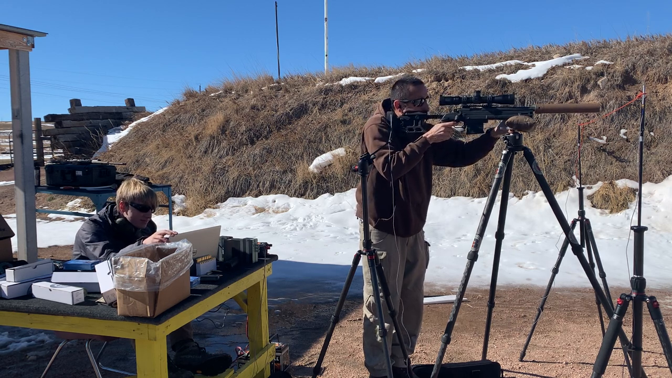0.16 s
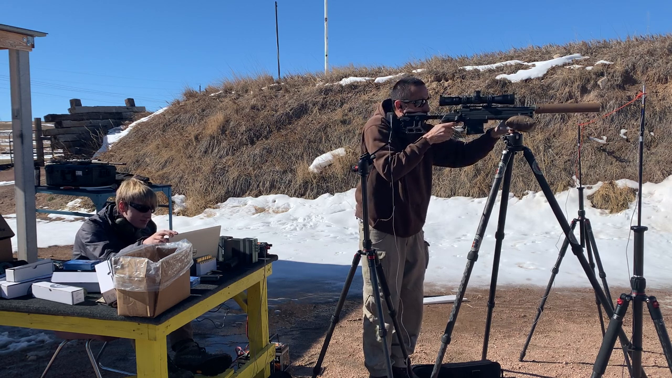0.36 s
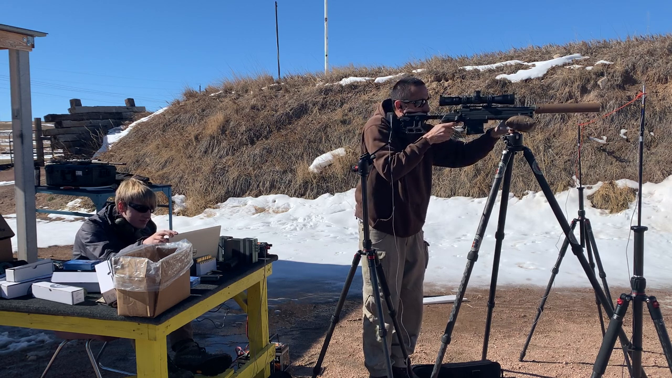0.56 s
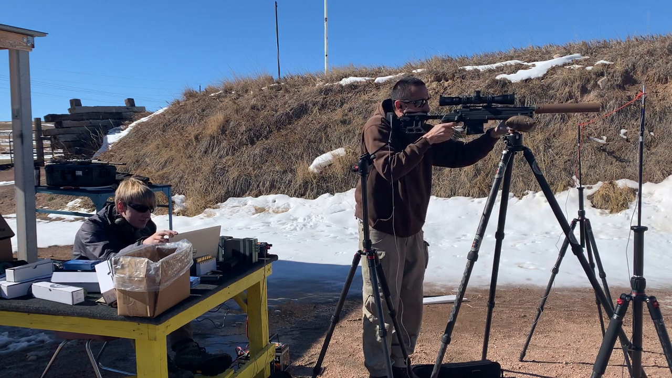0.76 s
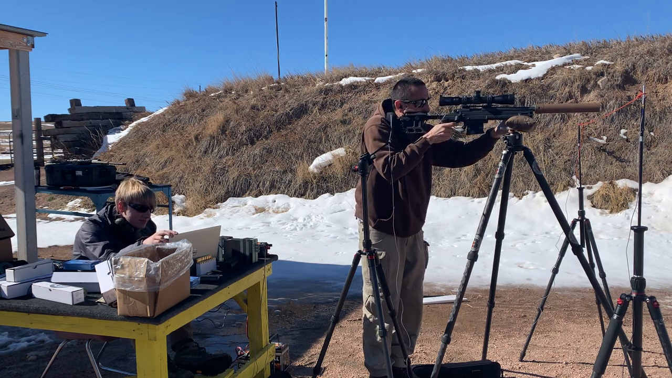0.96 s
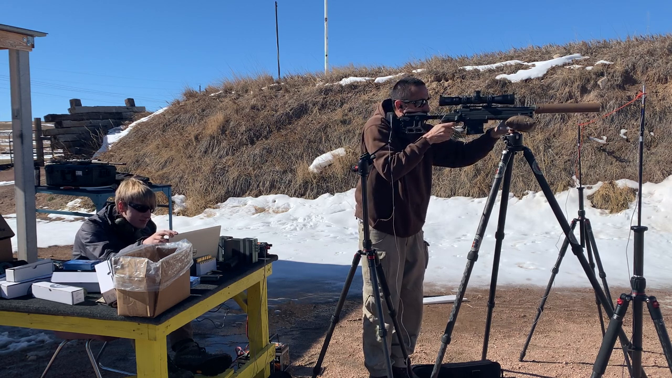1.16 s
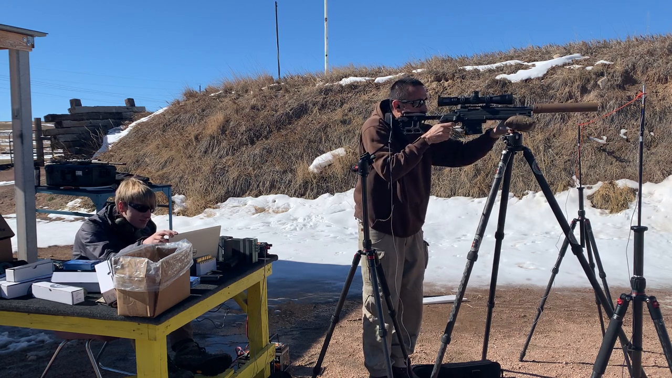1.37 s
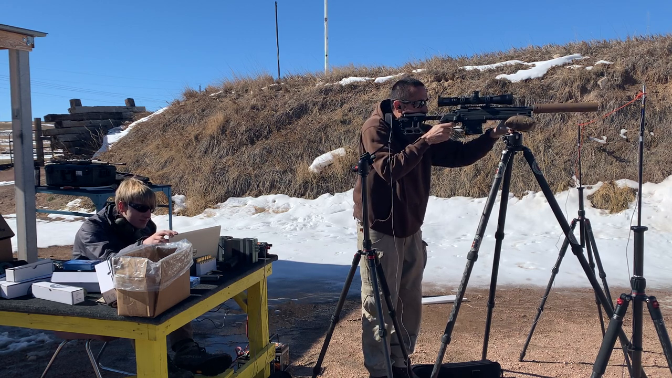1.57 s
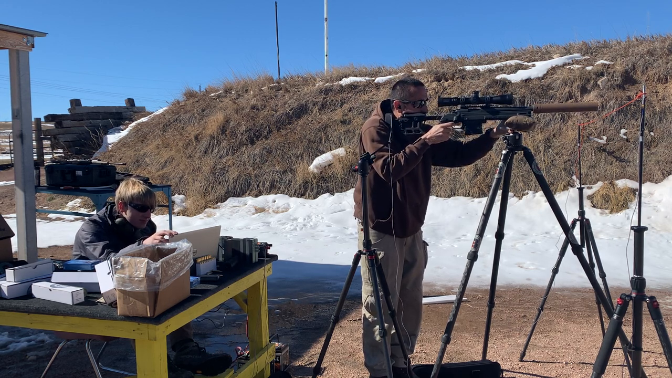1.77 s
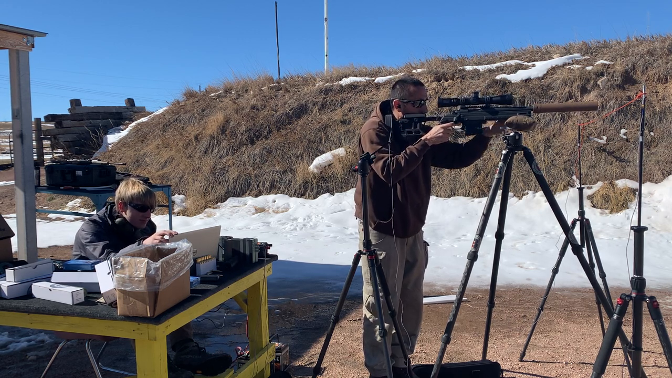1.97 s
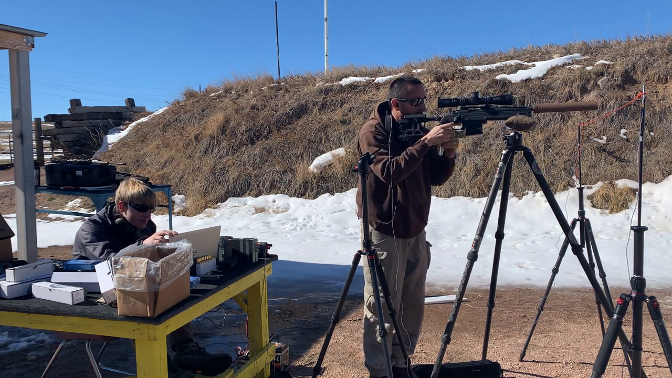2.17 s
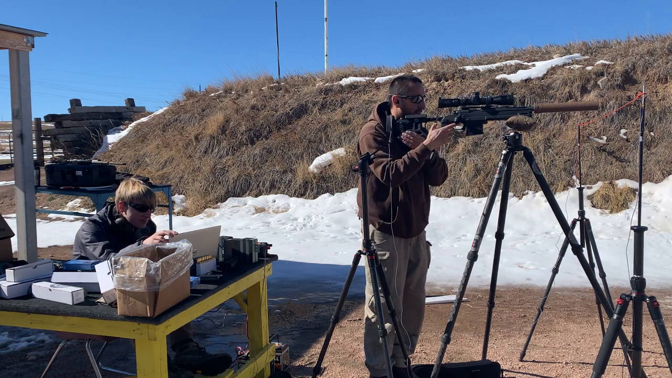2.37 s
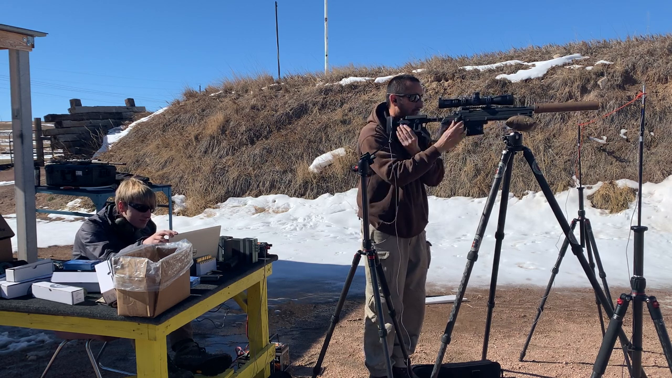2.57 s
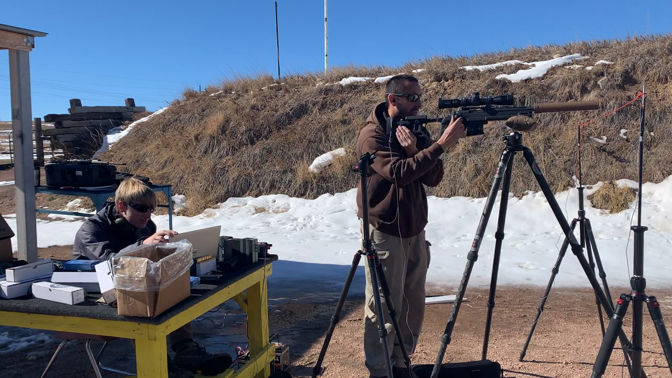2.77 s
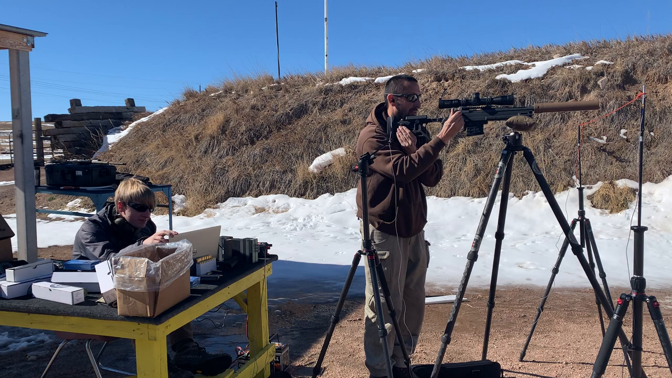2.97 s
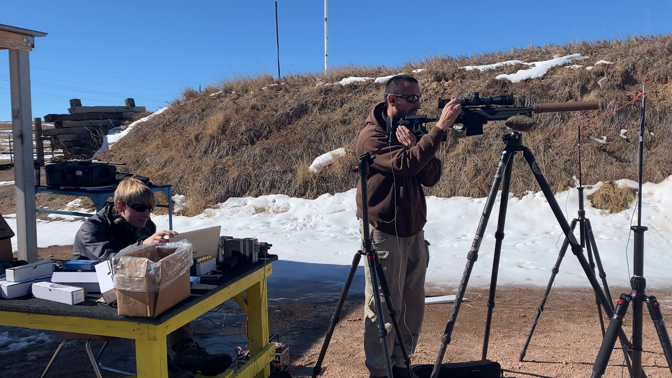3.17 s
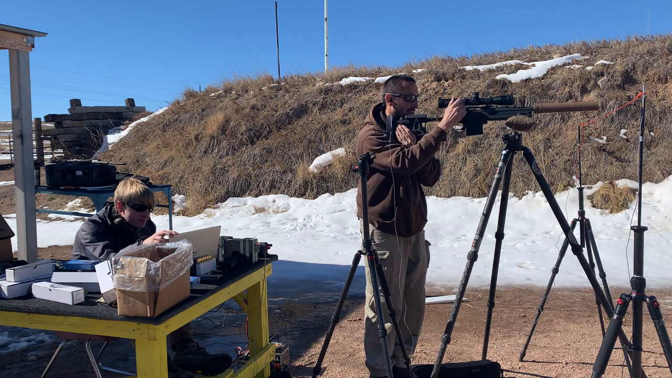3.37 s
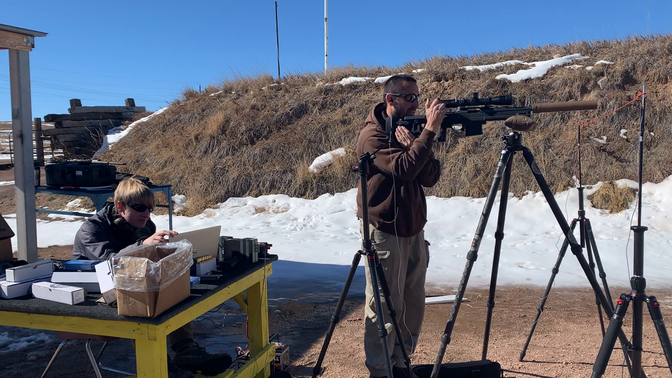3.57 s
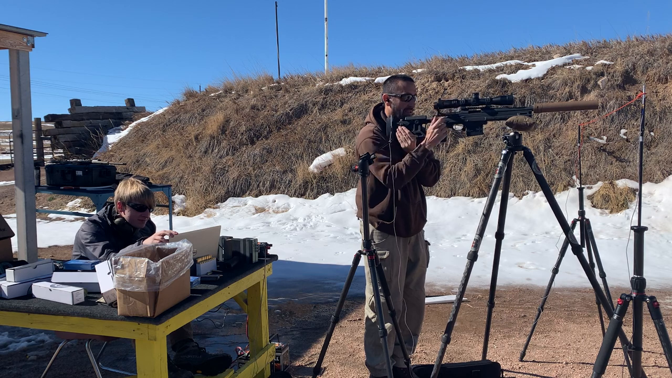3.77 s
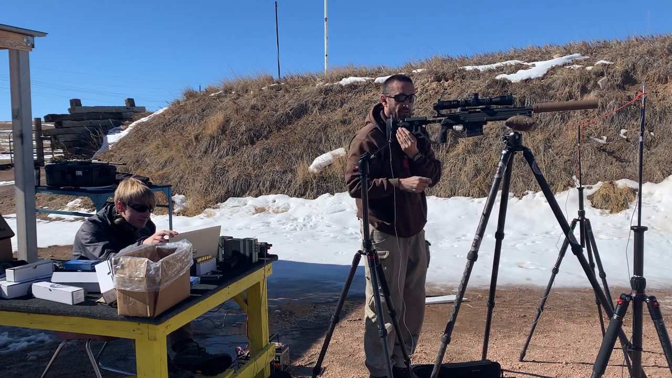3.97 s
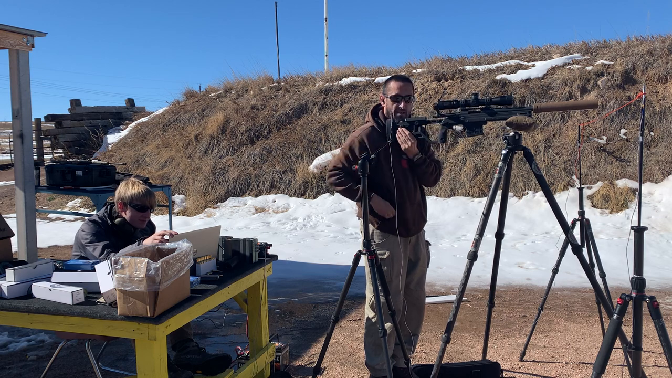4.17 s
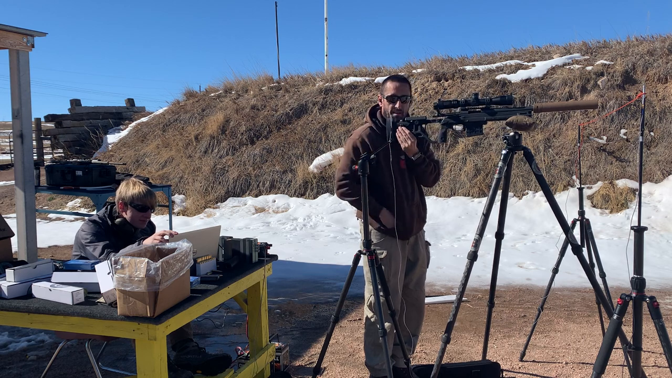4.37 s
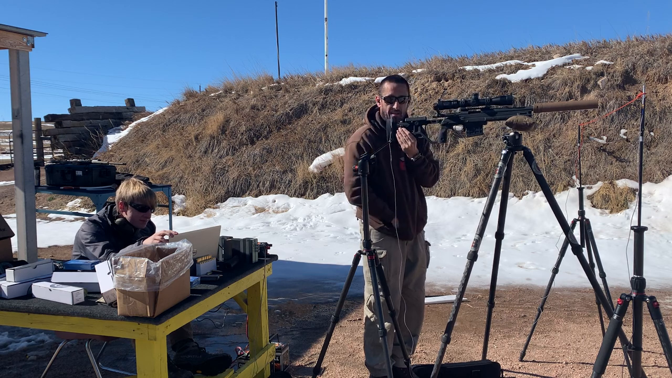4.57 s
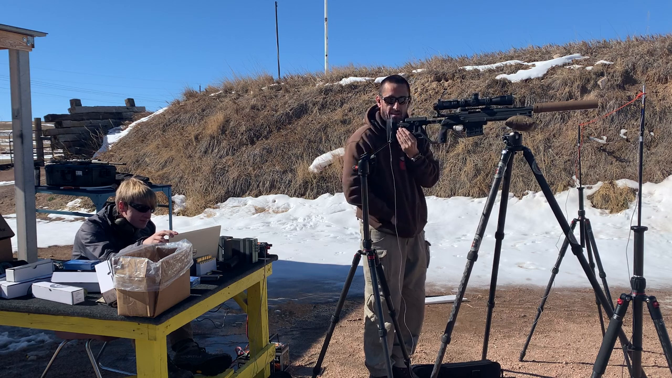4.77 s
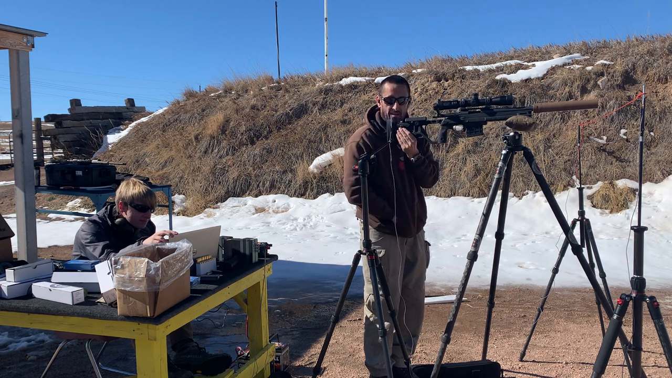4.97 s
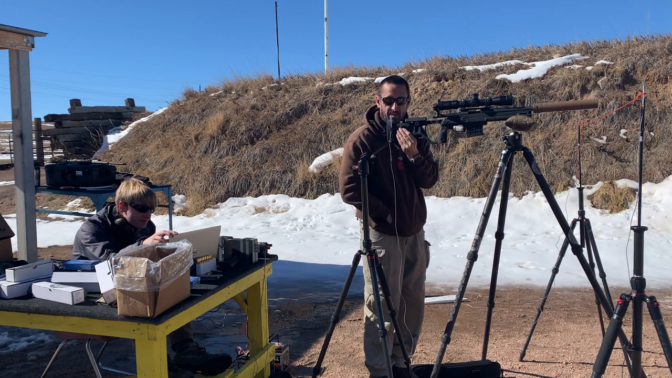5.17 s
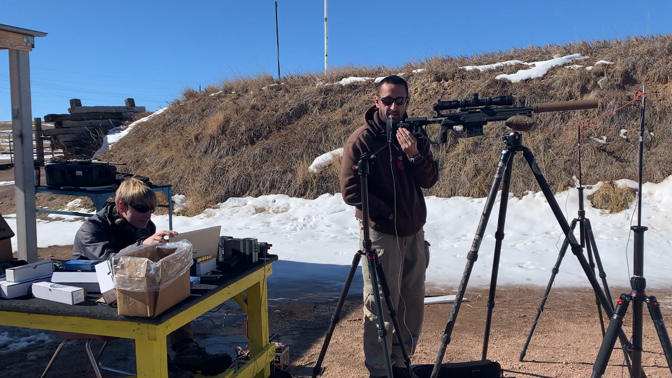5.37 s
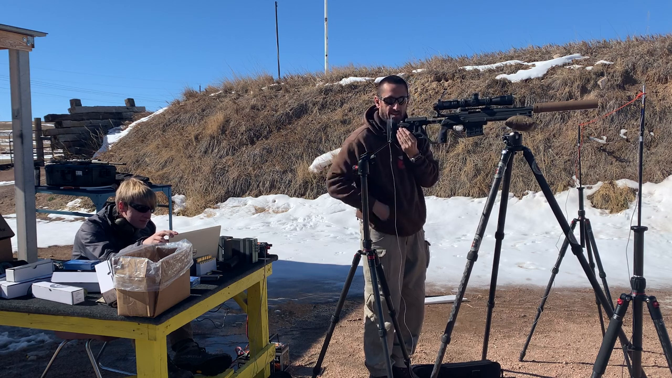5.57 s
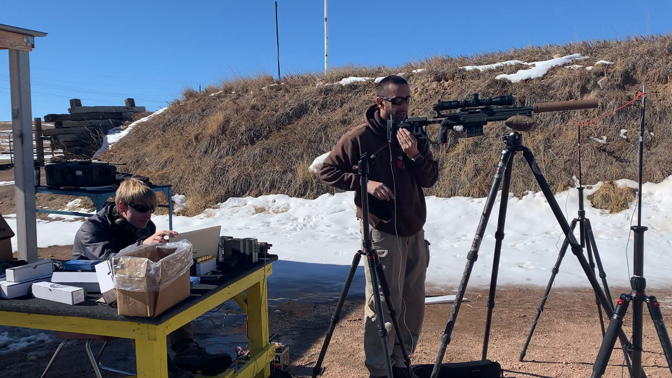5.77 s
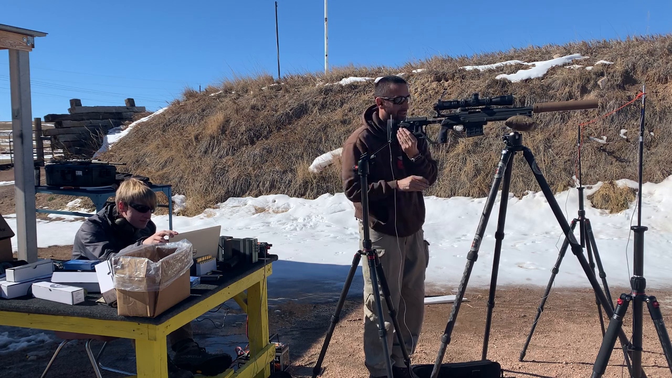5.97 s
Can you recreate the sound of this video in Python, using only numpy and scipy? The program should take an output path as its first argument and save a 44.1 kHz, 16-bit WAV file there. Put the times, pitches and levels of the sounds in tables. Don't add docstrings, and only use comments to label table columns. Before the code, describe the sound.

Quiet open-air range with low, lumpy wind buffeting the microphone and faint hiss. At 1.33 seconds a suppressed rifle fires once: an abrupt, loud burst of rushing gas with a brief metallic ring, slightly overloading the microphone. A sharp slap and hollow boom return from the earth banks at about 1.46, and the duller scatter dies away within roughly half a second. From 1.6 to 3.1 only tiny ticks, soft sleeve brushing and a thin lingering metal ring remain, while a very faint far engine whines up in steps from about 2.1 to 3.0 and settles into a steady drone. Between 3.24 and 3.75 the bolt is worked: quick steel clacks, strongest at 3.6, with bright brass clinks. Smaller metallic knocks come at 4.27 to 4.43, then sparse light ticks near 4.75, 4.9 and 5.0. Wind and distant drone continue to 6 seconds.

```python
import sys
import numpy as np
from scipy import signal
from scipy.fft import rfft, irfft, next_fast_len
from scipy.io import wavfile
from scipy.ndimage import uniform_filter1d

SR = 44100
rng = np.random.default_rng(int(sys.argv[2]) if len(sys.argv) > 2 else 0)


def transcribe(u):
    v = np.clip(np.atleast_2d(u).T, -1, 1)
    q = np.round(v * 32767).astype(np.int16)
    wavfile.write(sys.argv[1], SR, q)


def attenuation_scalar(level_db):
    decades = np.asarray(level_db, float) / 20
    return 10 ** decades


N = 265129


def evened(x):
    return x / np.sqrt(np.mean(x ** 2) + 1e-20)


def add(mix, start_s, sound):
    part = mix[round(start_s * SR):][:len(sound)]
    part += sound[:len(part)]


def level_over_time(rows):
    s, db = np.transpose(rows)
    return attenuation_scalar(np.interp(np.arange(N) / SR, s, db, left=-140, right=-140))


def coloured(points, size):
    fast = next_fast_len(size)
    hz = np.fft.rfftfreq(fast, 1 / SR)
    f, db = np.transpose(points)
    shape = attenuation_scalar(np.interp(np.log(hz + 1), np.log(f + 1), db))
    white = rng.standard_normal(size)
    return evened(irfft(rfft(white, fast) * shape, fast)[:size])


def band(x, lo_hz, hi_hz):
    limits = [lo_hz, min(hi_hz, SR / 2 - 1)]
    return signal.sosfilt(signal.butter(2, limits, "band", fs=SR, output="sos"), x)


def resonate(x, hz, width):
    r = np.exp(-np.pi * width / SR)
    return 2 * signal.lfilter([1 - r], [1, -r * np.exp(2j * np.pi * hz / SR)], x).real


def resonate_twice(x, hz, width, second_width):
    return resonate(resonate(x, hz, width), hz, second_width)


def flutter(per_s):
    knots = rng.standard_normal(600)
    return evened(np.interp(np.arange(N) * per_s / SR, np.arange(600), knots))


def air():
    # (f/Hz, level/dB per Hz)
    wind_colour = [(4.7, -30), (8.0, 3.5), (22, 6), (43, -5), (67, -6), (141, -29), (200, -31.5),
                   (260, -67), (440, -120)]
    # (t/s, level/dB)
    gusts = [(0, -51), (.3, -47.5), (.55, -53.5), (1.05, -50.5), (1.2, -60), (1.72, -51), (1.88, -59.5),
             (2.03, -52), (2.25, -60), (2.75, -60), (3.02, -52), (3.95, -62.5), (4.5, -54), (4.68, -59),
             (5.04, -50), (5.55, -58.5), (5.9, -49.5), (6.02, -52)]
    # (f/Hz, level/dB per Hz)
    still_colour = [(60, -31.5), (100, -10), (240, -21), (430, -26.5), (650, -28.5), (2040, -38),
                    (2930, -42), (6000, -48), (10000, -56), (13000, -57), (16500, -62.5)]
    lumps_db = 2.2 * flutter(9.9) + 0.91 * flutter(22)
    wind = level_over_time(gusts) * attenuation_scalar(lumps_db) * coloured(wind_colour, N)
    still_db = -74 + 0.4 * flutter(8)
    return wind + attenuation_scalar(still_db) * coloured(still_colour, N)


def engine():
    # (t/s, level/dB)
    strength = [(0, -91.5), (1.7, -88), (2.2, -83.5), (2.7, -75.5), (3.2, -73), (4.5, -72.5), (5.0, -74),
                (5.5, -74), (6.02, -73.5)]
    # (f/Hz, width/Hz, level/dB)
    drone_modes = [(398, 130, 0), (485, 86, -7.5), (670, 310, -7), (1000, 300, -12), (1360.4, 140, -9.5),
                   (1569, 12, -12.5), (1810, 200, -9), (2860, 260, -9.5), (3400, 95, -19.5),
                   (4400, 430, -19), (5100, 300, -24)]
    # (f/Hz, level/dB)
    hum = [(317.6, -88), (387.6, -79), (484.5, -79), (635.2, -85), (775.2, -82.5)]
    # (t/s, level/dB)
    load = [(4.7, -25), (5.0, -1.5), (5.5, -2.5), (6.02, 1)]
    # (start/s, end/s, from f/Hz, to f/Hz, level/dB)
    whine = [(2.079, 2.14, 2100, 2260, -89.5), (2.18, 2.236, 2150, 2260, -88),
             (2.276, 2.43, 1980, 2260, -91), (2.521, 2.807, 1930, 2180, -88), (2.798, 3.0, 2180, 2290, -87)]
    white = rng.standard_normal(N)
    drone = np.zeros(N)
    for hz, width, db in drone_modes:
        mode = evened(resonate_twice(white, hz, width, 2.85 * width))
        drone += attenuation_scalar(db + 1.1 * flutter(6.9)) * mode
    out = level_over_time(strength) * evened(drone)
    pulses = sum(attenuation_scalar(db) * evened(resonate(white, hz, 3.6)) for hz, db in hum)
    out += level_over_time(load) * pulses
    for start, end, from_hz, to_hz, db in whine:
        hz = np.linspace(from_hz, to_hz, round((end - start) * SR))
        tone = np.sin(2 * np.pi * np.cumsum(hz) / SR)
        add(out, start, attenuation_scalar(db + 1.5) * tone * signal.windows.tukey(len(hz), 0.5))
    return out


def blast():
    # (delay/s, level/dB, build-up/s per 60 dB, fade by 60 dB/s, thump against body/dB)
    returns = [
        (0, -16, 0.0012, .3, -12),
        (.013, -19, 0.0177, .085, -14),
        (.046, -42, 0.0572, .1, -12),
        (.068, -41, 0.0767, 0.22, -36),
        (.136, -46, .008, 0.078, -4.5),
        (.19, -58, 0.29, .09, -6),
        (.254, -70, .07, .11, -12),
    ]
    colour_db = [0, 0, 0, -1]
    air_loss = [0, 0, 24, 270]
    shot_s, jet_hold_s, jet_stop_t60 = 1.3307, 0.0099, 0.016
    field_db, field_t60 = -47.5, 0.53
    t = np.arange(N) / SR - shot_s
    field = attenuation_scalar(2 * field_db - 120 * t / field_t60) * (t > 0)
    power = np.outer([attenuation_scalar(-50), 1, 1, 1], field)
    for k, (delay, db, rise, t60, thump_db) in enumerate(returns):
        u = t - delay
        level_db = db + 60 * np.minimum(u / rise, -u / t60)
        if k == 0:
            level_db -= 60 * np.maximum(u - jet_hold_s, 0) / jet_stop_t60
        power += np.outer([attenuation_scalar(2 * thump_db), 1, 1, 1], attenuation_scalar(2 * np.maximum(level_db, -200)))
    return np.sqrt(power) * attenuation_scalar(np.c_[colour_db] - np.c_[air_loss] * np.maximum(t, 0))


def shot():
    # (f/Hz, level/dB per Hz)
    jet_colour = [(60, -26), (260, -12), (400, -26), (600, -16.5), (900, -10.5), (1800, -6), (3000, -10.5),
                  (4800, -10), (7500, -11.5), (10500, -15), (13000, -27), (14600, -28.5), (16500, -40)]
    # (f/Hz, width/Hz, level/dB)
    tube_modes = [(260, 40, -14.5), (800, 90, -16), (1060, 50, -15), (1790, 90, -4), (2111.5, 50, -10),
                  (4570, 90, -7), (4930, 40, -9), (5250, 90, -11), (6928, 150, -15)]
    white = rng.standard_normal(N)
    t = np.arange(N) / SR
    tube = sum(attenuation_scalar(db) * evened(resonate_twice(white, hz, w, 3 * w)) for hz, w, db in tube_modes)
    tube *= attenuation_scalar(-60 * np.maximum(t - 1.345, 0) / 0.12)
    fast = next_fast_len(N)
    jet = rfft(coloured(jet_colour, N) + tube, fast)
    octave = np.log(np.fft.rfftfreq(fast, 1 / SR) + 1)
    centres = np.log([250, 2100, 5000, 10000])
    parts = [irfft(jet * np.interp(octave, centres, hat), fast)[:N] for hat in np.eye(4)]
    grain = attenuation_scalar(1.8 * evened(uniform_filter1d(rng.standard_normal(N), 40)))
    loud = slice(round(1.33 * SR), round(1.4 * SR))
    return grain * sum(g * p / p[loud].std() for g, p in zip(blast(), parts))


def hit(peak_db, low_hz, high_hz, bright_db, t60, body=0.98):
    # (f/Hz, width/Hz, level/dB)
    action_modes = [(823, 110, -9.5), (1040, 29, -3.5), (1337, 58, -2), (1540, 53, -2), (1768, 31, 3),
                    (2530, 47, -13), (3300, 50, -45), (4840, 180, -9)]
    t = np.arange(5000) / SR
    noise, rough, luck = rng.standard_normal((3, len(t)))
    rattle = noise * attenuation_scalar(3.0 * rough - 60 * (t / t60) ** 1.4) * np.minimum(t / 0.0003, 1)
    rattle[12] += 7.0
    action = np.zeros(len(t))
    for (hz, width, db), r in zip(action_modes, luck):
        action += attenuation_scalar(db + 3 * r) * resonate(rattle, hz, width) / np.sqrt(width)
    low = evened(resonate_twice(rattle, low_hz, 400, 900))
    low += body * (evened(action) + 0.6 * evened(band(rattle, 700, 3600)))
    crack = 0.022 * band(rattle * attenuation_scalar(-60 * t / 0.006), 9000, 17000)
    high = band(resonate(rattle, high_hz, 1500) + 0.45 * rattle, 3000, 9500)
    high = band(high, 2500, 10000) + crack
    thud = band(band(rattle * attenuation_scalar(-60 * t / 0.012), 350, 900), 280, 1080)
    sound = evened(band(low, 594, 5700))
    sound += attenuation_scalar(bright_db) * evened(high)
    sound += 0.1 * body * evened(thud)
    return attenuation_scalar(peak_db) * sound / abs(sound).max()


def far_bank():
    # t/s, peak level/dB, low ring f/Hz, high ring f/Hz, brightness/dB, fade by 60 dB/s
    slap = (1.4641, -27.5, 5250, 5600, -5, .004)
    # (t/s, peak level/dB)
    booms = [
        (1.4637, -44),
        (1.479, -50),
    ]
    boom_hz, boom_t60 = 422, 0.041
    out = np.zeros(N)
    add(out, slap[0], hit(*slap[1:], body=0.26))
    t = np.arange(2000) / SR
    tone = np.sin(2 * np.pi * boom_hz * t) + 0.7 * np.sin(np.pi * boom_hz * t)
    for s, db in booms:
        add(out, s, attenuation_scalar(db - 60 * t / boom_t60) * tone * np.minimum(t / 0.0018, 1))
    return out


def bolt_and_case():
    # (t/s, peak level/dB,
    # low ring f/Hz, brightness/dB, rattle fade by 60 dB/s)
    bolt_then_case = [(1.467, -53, 1130, -24.5, 0.017), (3.238, -52, 800, -21, 0.03), (3.2504, -41, 1300, -5, 0.024),
                      (3.482, -37.5, 2080, 0, 0.026), (3.506, -49, 1775, -14.5, 0.069),
                      (3.537, -30.5, 2530, -8.5, 0.037), (3.547, -49, 1150, -17, 0.11),
                      (3.606, -18, 1000, -4.5, 0.025), (3.726, -56.5, 2360, -20, 0.11), (3.758, -60, 2230, -12, 0.04),
                      (4.271, -49, 1900, 5, 0.018), (4.383, -34, 2300, -7, 0.017), (4.434, -50, 1790, -5, 0.016)]
    # (t/s, peak level/dB, low ring f/Hz, brightness/dB, rattle fade by 60 dB/s)
    case = [(3.257, -36, 750, -4, 0.019), (3.566, -41.5, 1810, -1, 0.02), (3.579, -36.5, 2510, 3, 0.018),
            (3.584, -42.5, 1780, -13, 0.025), (3.610, -29, 1720, -14, 0.025),
            (4.2637, -43.5, 1670, -11, 0.0068), (4.2666, -40.5, 1985, -7.5, 0.0059),
            (4.3968, -33.5, 1720, -5, 0.015)]
    out = np.zeros(N)
    for knocks, high_hz in [(bolt_then_case, 4680), (case, 7000)]:
        for s, db, low_hz, bright_db, t60 in knocks:
            body = 0.98 if s < 4.0 else 0.35
            add(out, s - 0.0005, hit(db, low_hz, high_hz, bright_db, t60, body))
    return out


def rings():
    # (t/s, f/Hz, level/dB, fade by 60 dB/s, length/s)
    ringing = [(1.562, 1041, -85.5, 4.2, 0.92), (1.821, 1041, -79, 5, 0.14), (2.076, 1044, -85, 5.4, 0.17),
               (3.258, 1040, -76, 0.76, 0.13), (3.253, 4770, -62, 0.17, 0.044), (3.508, 1050, -66, .5, .09),
               (3.566, 8030, -59, .3, 0.016), (3.573, 8030, -45, 0.18, 0.0301),
               (3.608, 1040, -54, 0.3, 0.084), (3.62, 8110, -86, .5, .1), (3.675, 8030, -75.5, 0.24, .02),
               (3.66, 5250, -83.5, 0.74, .15), (3.66, 4140, -89, 2.7, 0.56), (3.726, 1050, -52, 0.1, 0.051),
               (4.276, 7970, -66, 0.15, 0.11), (4.535, 5250, -71.5, 0.12, 0.067),
               (4.912, 5250, -72.5, 0.14, 0.048), (4.997, 5250, -70.5, 0.18, 0.028),
               (5.211, 8120, -86, 0.17, .05)]
    out = np.zeros(N)
    for s, hz, db, t60, length in ringing:
        t = np.arange(round(length * SR)) / SR
        pair = np.sin(2 * np.pi * hz * t) + 0.45 * np.sin(2 * np.pi * (hz + 14) * t + 1.5)
        add(out, s, pair * attenuation_scalar(db - 60 * t / t60) * signal.windows.tukey(len(t), 0.3))
    return out


def ticks():
    # (t/s, peak level/dB, low ring f/Hz, high ring f/Hz, brightness/dB)
    touches = [(1.643, -61.5, 6200, 4700, 3), (2.009, -70, 1540, 4910, 2.5), (2.032, -67, 1550, 4800, -11),
               (2.135, -75, 2360, 8500, 1), (2.148, -76, 1610, 8500, 11.5), (2.459, -71.5, 3230, 4690, -4),
               (2.537, -66, 1799, 9000, -4.5), (2.637, -67, 2055, 7360, 8), (2.807, -63, 1900, 4630, -9),
               (2.848, -72, 2113, 6500, 7), (2.868, -53, 1810, 4630, -24), (2.925, -72.5, 1940, 9170, 4),
               (3.085, -61, 2300, 4000, -5), (3.915, -70, 1790, 6460, 5), (4.512, -64, 3030, 5430, 4),
               (4.534, -66, 5240, 9200, -4), (4.742, -55.5, 5250, 7000, 0),
               (4.921, -54.5, 5200, 6400, -0.5), (4.933, -67, 5190, 7500, 0), (4.996, -66, 5100, 7440, -3),
               (5.106, -73, 4000, 4760, -1), (5.207, -74, 7000, 8000, 2)]
    out = np.zeros(N)
    for s, db, low_hz, high_hz, bright_db in touches:
        t60 = 0.016 * 2 ** (-bright_db / 18)
        add(out, s - 0.0005, hit(db, low_hz, high_hz, bright_db, t60, body=0.12))
    return out


def rustles():
    # (start/s, end/s, level/dB, centre f/Hz)
    brushes = [(1.965, 2.07, -84.5, 4940), (2.42, 2.626, -88.5, 5860), (3.237, 3.332, -90, 4970),
               (3.875, 3.97, -88, 6940), (4.5, 4.589, -84, 6010)]
    out = np.zeros(N)
    for start, end, db, hz in brushes:
        fibres, catches = rng.standard_normal((2, round((end - start) * SR)))
        uneven = attenuation_scalar(4 * evened(uniform_filter1d(catches, 150)))
        brush = band(fibres * uneven, 0.45 * hz, 1.7 * hz)
        add(out, start, attenuation_scalar(db) * evened(brush) * np.hanning(len(brush)))
    return out


def bank_scatter(hits):
    # (delay/s, level/dB)
    banks = [(.005, -2), (0.01, -26), (0.028, -28.5), (.06, -30.5), (.075, -43), (.13, -45)]
    delay, db = np.transpose(banks)
    t = np.arange(8000) / SR
    spray = rng.standard_normal(len(t)) * attenuation_scalar(np.interp(t, delay, db) - 27.5)
    spray *= (t > 0.003) * (t < delay[-1])
    return signal.oaconvolve(hits, band(band(spray, 700, 5200), 300, 9100))[:N]


def scene():
    hits = far_bank() + bolt_and_case() + ticks()
    handling = hits + bank_scatter(hits) + rustles()
    return (air() + engine() + shot() + handling + rings())[None]


def low_pass(x):
    return signal.sosfilt(signal.butter(12, 16600, fs=SR, output="sos"), x)


def record(dry):
    ceiling = 0.37
    held = ceiling * np.tanh(dry / ceiling)
    held = signal.oaconvolve(held, signal.firwin(255, 16300, fs=SR)[None], "same")
    held *= np.minimum(np.arange(N) / 60, 1)
    return low_pass(held)


dry = scene()
out = record(dry)
transcribe(out)
```